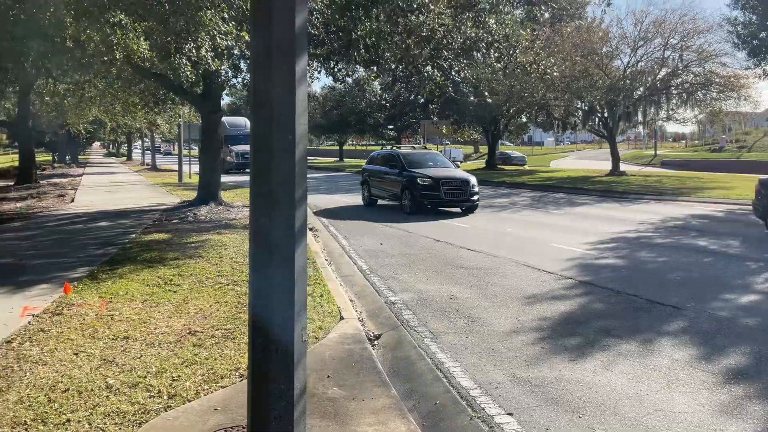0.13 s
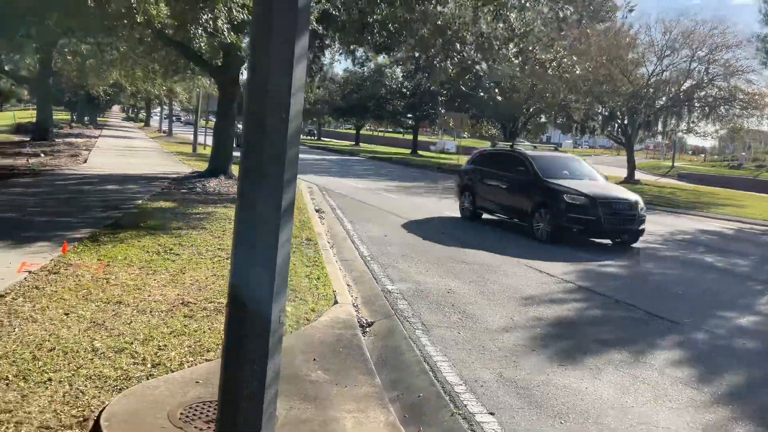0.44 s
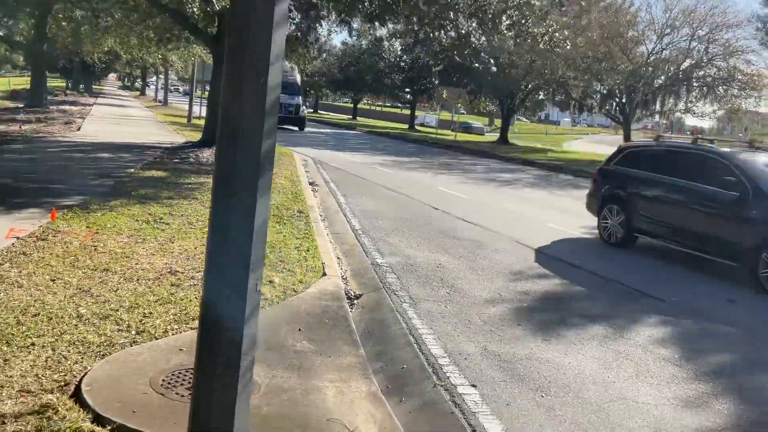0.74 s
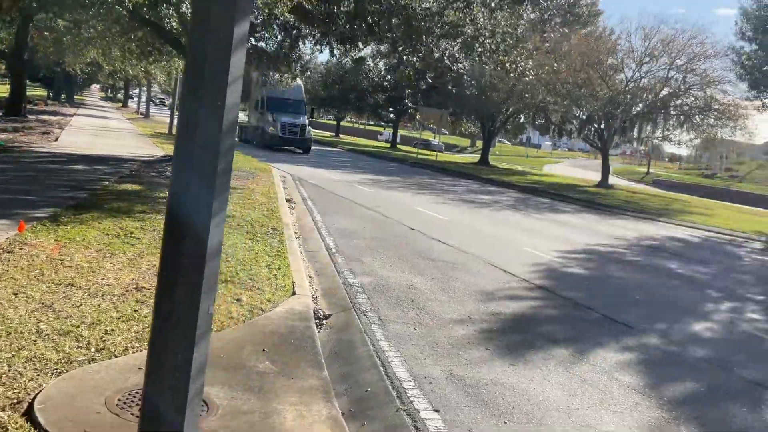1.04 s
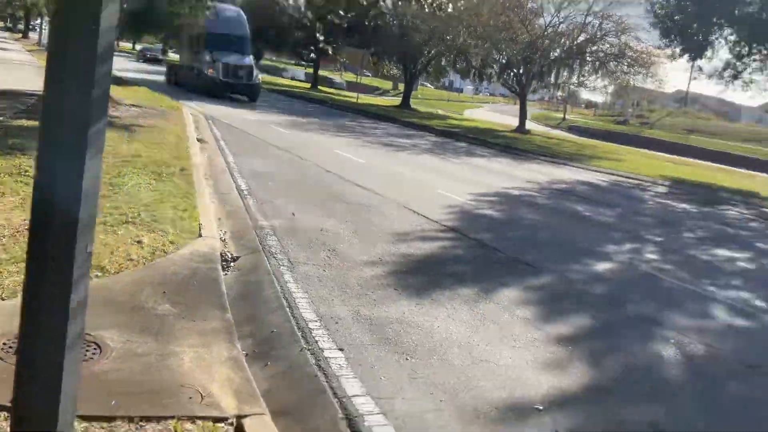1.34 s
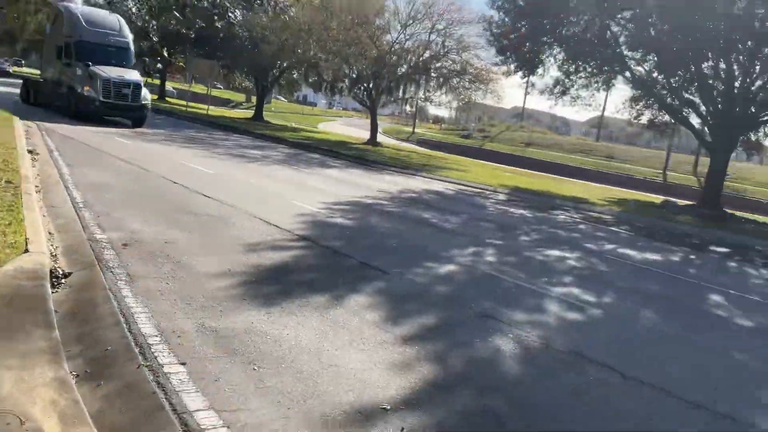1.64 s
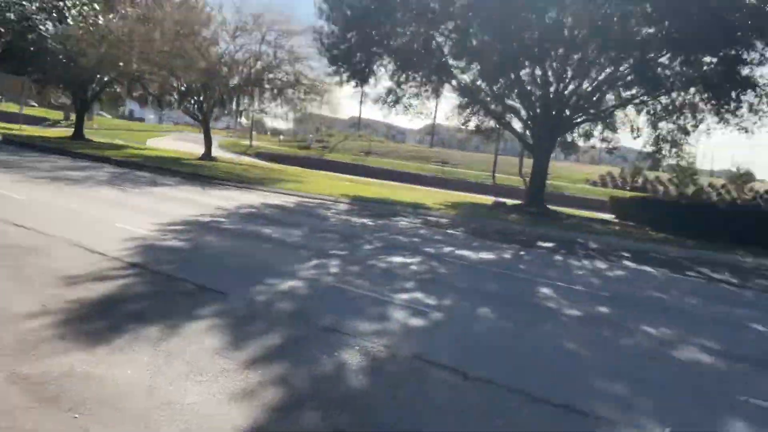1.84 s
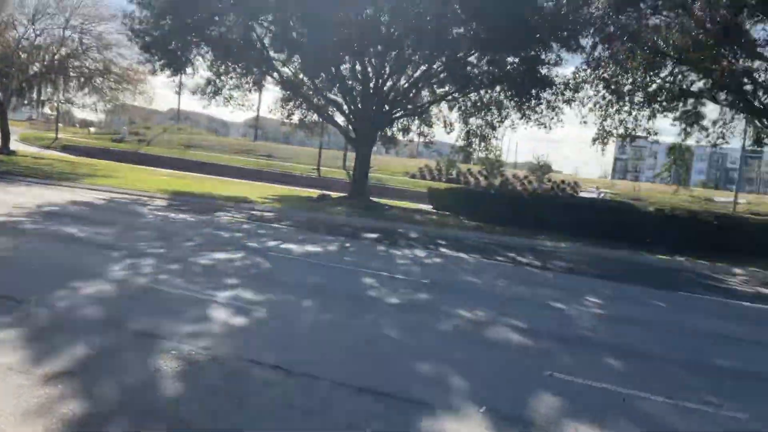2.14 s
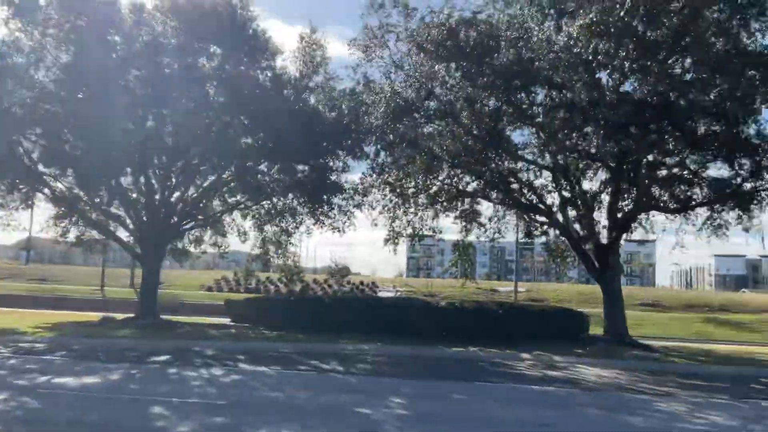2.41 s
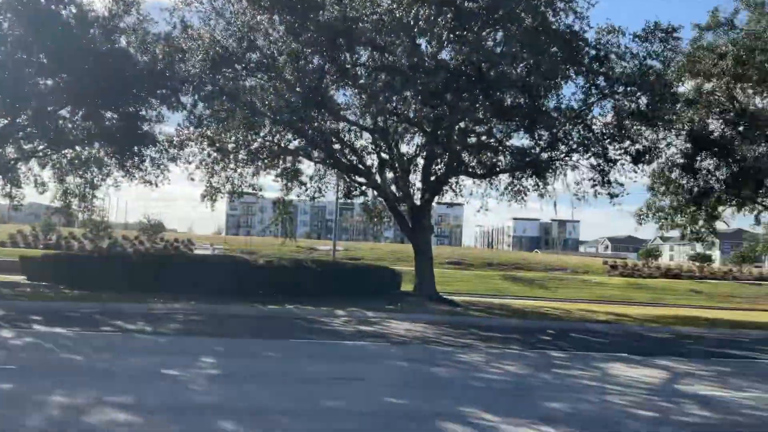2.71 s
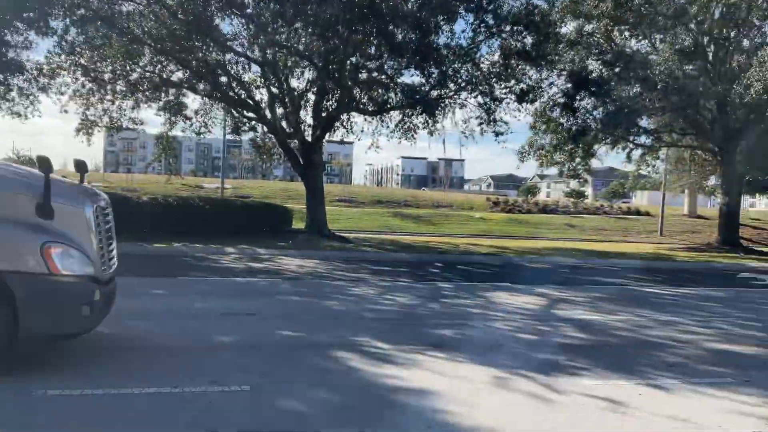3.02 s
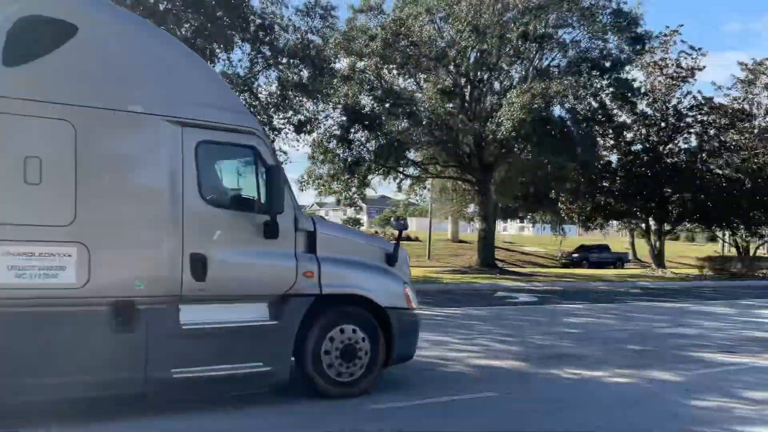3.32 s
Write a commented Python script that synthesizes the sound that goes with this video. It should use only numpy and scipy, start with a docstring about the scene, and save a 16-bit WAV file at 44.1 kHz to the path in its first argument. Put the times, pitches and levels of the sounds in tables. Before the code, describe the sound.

A diesel truck rumbles up and passes close, following the tyre roar of two cars.

```python
"""A heavy diesel truck draws near and passes close by the kerb, after two cars roll past on concrete.
The truck's engine fires in a steady hum that drops in pitch as it goes by. Its tyres roar, hiss and
sing, grit snaps under them, loose metal clinks, and the air it pushes thumps on the microphone.
A handheld recorder hears it all through two closely spaced openings (ports), left and right."""
import sys
import numpy as np
from scipy import signal
from scipy.fft import rfft, irfft
from scipy.io import wavfile
from scipy.ndimage import uniform_filter1d

SR = 44100
rng = np.random.default_rng(int(sys.argv[2]) if len(sys.argv) > 2 else 0)


def generate_wav(sig):
    """Save sig (samples, or channels by samples) to the path in sys.argv[1] as 16-bit PCM at SR."""
    pcm = np.round(np.clip(np.atleast_2d(sig).T, -1, 1) * 32767).astype(np.int16)
    wavfile.write(sys.argv[1], SR, pcm)


N = 153027
T = np.arange(N) / SR  # the time of each sample, in seconds

# The deep hum of traffic. Each row: time in seconds, pitch in Hz, level in dB.
TRAFFIC_HUM = [(0, 58, -41), (1.2, 57.5, -35.5), (2.0, 55, -38.5), (3.47, 53, -38)]
# The tyre roar of the cars. Each row: time in seconds, level in dB.
CAR_LEVELS = [(0, -24), (.3, -22.5), (.6, -22.5), (.95, -22), (1.2, -24), (1.45, -27.5), (1.75, -34.5),
              (2.1, -41), (3.47, -53)]
# Brief hums of tyres. Each row: peak time and width in seconds, pitch and width in Hz, level in dB.
TYRE_HUMS = [(.3, 0.2, 1770, 452, -31.5), (.86, 0.17, 700, 190, -27), (1.15, 0.12, 742, 150, -26.5),
             (1.661, 0.23, 1330, 338, -30.5), (3.42, 0.14, 610, 140, -27.5), (.55, 0.26, 3900, 1100, -49.5)]
# The colour of each noise, from bass to treble. Each row: frequency in Hz, relative strength in dB.
CAR_TYRE_COLOUR = [(60, -26), (180, -12), (330, -5), (490, -7.5), (620, -1.5), (820, -3.5), (955, -5.5),
                   (1120, -2), (1370, -8), (1560, -6), (1880, -10.5), (2150, -12), (2750, -20), (3600, -24),
                   (4300, -29), (6000, -35.5), (9000, -38.5), (12000, -46.5), (15500, -62)]
TRUCK_TYRE_COLOUR = [(120, -36), (300, -5), (410, -4), (530, -7.5), (630, -8), (730, -7), (850, -6),
                     (1080, -4.5), (1250, -6), (1600, -9), (2200, -18), (3000, -23), (4200, -29),
                     (6000, -29), (9000, -52), (15500, -68)]
RUMBLE_COLOUR = [(20, -38), (36, -36), (50, -4), (65, 1), (100, -1), (160, -1), (240, -3.5), (380, -9),
                 (550, -23), (1200, -64)]
HISS_COLOUR = [(2000, -20), (3400, -4), (4500, -4.0), (5200, -5.5), (6000, 4.0), (7200, -1), (9000, -2),
               (11000, -11.0), (13000, -19.5), (15500, -50)]
WHINE_COLOUR = [(560, -62), (680, -3.5), (790, 0), (900, -2.5), (1050, -13), (1400, -57)]
SIZZLE_COLOUR = [(2000, -25), (4000, 0), (8000, -6), (11000, -6), (15500, -12)]
SNAP_COLOUR = [(1800, -25), (3800, 5), (8000, -3), (11000, -9), (15500, -17)]
GUST_COLOUR = [(25, -35), (45, 8), (90, -12), (150, 1), (220, -9), (400, -3), (700, -48)]
# How the two ports differ. Each row: frequency in Hz, left level minus right in dB,
# likeness from 0 to 1, how far the left wave is ahead in radians.
CAR_PORTS = [(100, -19, 1, -0.0), (340, -1.5, 0.93, -0.5), (503, -7, 0.23, 0.5), (566, -3.5, 0.92, 1.82),
             (776, 1.5, 0.7, 1.5), (926, -8, 0.3, 1.96), (1150, 5.5, 0.5, 0.7), (1660, 0.5, 0.53, -1.55),
             (2000, 0.5, 0.46, -2), (2560, 0, 1, -2.5), (3390, -1, 0.99, -5), (4200, 0, 0.97, -6),
             (6000, 0, 1, -6.5), (7900, -5, 0.3, -4)]
TRUCK_PORTS = [(100, -2.5, 0.97, 0.0), (270, -3.5, 0.95, 0.7), (476, -2, 0.55, 0.52), (616, 0.5, 0.72, 2),
               (880, 12.5, 0.86, 3), (980, 2, 0.075, 1.5), (1270, 6, 0.47, 2.44), (1700, 1, 0.5, 1),
               (2260, -2.5, 0.12, -1), (2980, -3.5, 0.79, -3), (3600, -3.5, 0.53, -5),
               (4360, -2.5, 0.91, -6.5), (5800, -5.5, 0.95, -6.5), (8050, -2, 0.96, -5.5)]
# Gusts ahead of the truck. Each row: peak time and width in seconds, level in dB.
GUSTS = [(2.64, 0.038, -26), (2.87, .05, -28)]
# Thumps of air. Each row: peak time and width in seconds, pitch in Hz, level in dB.
THUMPS = [(2.623, .009, 120, -10), (2.642, .004, 300, -15), (2.668, .009, 105, -17),
          (2.708, .005, 125, -14), (2.772, .007, 110, -15), (2.798, .005, 150, -15), (2.853, .010, 135, -7),
          (2.918, .0045, 115, -4), (3.113, .005, 130, -16), (3.277, .006, 145, -14)]
# Spurts of hiss. Each row: peak time and width in seconds, pitch and width in Hz, level in dB.
SPURTS = [(1.69, 0.026, 10500, 8000, -52), (2.387, .009, 6850, 1000, -41), (2.44, .014, 6650, 1500, -40),
          (2.58, .05, 8100, 700, -48), (2.81, .007, 11000, 2500, -46)]
# A rising rush, a falling whistle and the tread's note. Each row: time in seconds, pitch in Hz, level in dB.
RUSH = [(0, 6200, -78), (2.0, 6000, -64), (2.38, 6580, -47), (2.75, 8450, -46), (2.95, 9020, -51),
        (3.32, 10700, -61)]
WHISTLE = [(2.9, 14000, -85), (3.01, 13600, -59), (3.12, 12300, -62), (3.18, 10900, -55),
           (3.23, 10330, -46), (3.26, 9600, -61), (3.35, 8400, -85)]
TREAD_NOTE = [(1.2, 843, -50), (1.7, 840, -31.5), (2.65, 825, -31), (3.0, 790, -20), (3.25, 754.4, -24.5),
              (3.47, 692, -27)]
# Snaps of grit and clinks of loose metal. Each row: start in seconds, level in dB.
GRIT_SNAPS = [(.578, -39), (2.958, -44), (3.073, -42), (3.152, -39)]
CLINKS = [(2.714, -37), (2.882, -35), (2.914, -36), (2.955, -30), (3.005, -33), (3.07, -31), (3.15, -34),
          (3.218, -36)]
# The notes the metal rings with. Each row: pitch in Hz, relative strength in dB.
METAL_NOTES = [(4050, -2), (5900, 3), (7700, 0), (8850, -1), (11750, -12), (13750, -11)]
# The rolling truck. Each row: time in seconds, then levels in dB of rumble, tyre roar, hiss,
# tread whine and grit sizzle.
TRUCK_LEVELS = [(0, -30.5, -33.5, -65, -31.5, -71), (.7, -29.5, -40.5, -50, -28, -58),
                (1.4, -29, -29.5, -51.5, -28, -71), (1.9, -26, -27.5, -46.5, -28.5, -65),
                (2.25, -27, -26, -44, -25, -64), (2.45, -24, -25, -43.5, -26, -52),
                (2.65, -21, -24.5, -44.5, -23.5, -54), (2.95, -23, -23, -40, -23.5, -45),
                (3.2, -25.5, -22.5, -42, -21.5, -45.5), (3.33, -22.5, -24, -45.5, -24, -51),
                (3.47, -17, -22.5, -51, -25.5, -48)]
# The drone as the cab passes. Each row: pitch at the swell's peak in Hz, width in Hz, level in dB.
DRONE_NOTES = [(193, 13, -26.5), (258, 8.9, -24.5), (315, 13.7, -37), (291, 120, -30)]
# The diesel engine. Each row: time in seconds, firings per second as heard, level in dB.
ENGINE = [(0, 125.1, -34), (.9, 125.7, -31), (1.5, 125.7, -31), (2.0, 127.7, -28.5), (2.35, 127.7, -23),
          (2.7, 126.1, -25.5), (2.9, 124.8, -25.5), (3.1, 122.1, -19.5), (3.25, 116.9, -24),
          (3.47, 112.5, -27)]
# Its tones. Each row: multiple of the firing rate, level in dB added to the engine's.
ENGINE_TONES = [(.838, -7), (1, -1), (1.5, -13.5), (2, -12), (3, -16)]


def amp(db):
    """Turns decibels into a number to multiply a sound by."""
    return 10 ** (np.asarray(db) / 20)


def unit(x):
    """Scales a signal so that its average strength (rms) is 1."""
    return x / np.sqrt(np.mean(x ** 2) + 1e-20)


def curve(table, column=1):
    """Joins a column's values with straight lines, giving one value per sample."""
    rows = np.array(table)
    return np.interp(T, rows[:, 0], rows[:, column])


def at_hz(table, hz, column=1):
    """Looks up a column by frequency, giving every octave equal room."""
    rows = np.array(table)
    return np.interp(np.log(hz + 1), np.log(rows[:, 0]), rows[:, column])


def swell(peak_s, width_s):
    """A bell-shaped rise and fall around a moment."""
    return np.exp(-.5 * ((T - peak_s) / width_s) ** 2)


def hits(table, decay_s):
    """A loudness that jumps up at each start time and dies away."""
    return sum(amp(db) * (T >= s) * np.exp(-abs(T - s) / decay_s) for s, db in table)


def drift(rate_hz):
    """A smooth random wobble of strength 1; a higher rate wobbles faster."""
    hz = np.fft.rfftfreq(N, 1 / SR)
    return unit(irfft(rfft(rng.standard_normal(N)) * np.exp(-.5 * (hz / rate_hz) ** 2), N))


def band(hz, width_hz):
    """Noise around a pitch: narrow sounds like a note, wide like a hiss."""
    phase = 2 * np.pi * np.cumsum(hz * np.ones(N)) / SR
    return unit(drift(width_hz / 2) * np.cos(phase) + drift(width_hz / 2) * np.sin(phase))


def roar(colour, ports, patch_db, size=1024):
    """Noise of a given colour with louder and softer patches, as the two ports hear it."""
    hz = np.fft.rfftfreq(size, 1 / SR)
    a, b, c, d, patches = rng.standard_normal((5, 4 * N // size + 6, len(hz)))
    patches = uniform_filter1d(patches, size=8, axis=0)  # smooth over time
    patches = unit(uniform_filter1d(patches, size=9, axis=1))  # and over frequency
    balance = amp(at_hz(ports, hz))
    likeness = np.clip(at_hz(ports, hz, column=2), 0, 1)
    lag = np.exp(-1j * at_hz(ports, hz, column=3))
    left = a + 1j * b
    right = (likeness * left + np.sqrt(1 - likeness ** 2) * (c + 1j * d)) * lag
    spectra = np.array([left * balance, right]) / np.sqrt(1 + balance ** 2)
    spectra *= amp(at_hz(colour, hz) + patch_db * patches)
    _, noise = signal.istft(spectra.transpose(0, 2, 1), nperseg=size, noverlap=size * 3 // 4)
    return unit(noise[:, :N])


def traffic_hum():
    """A low, wavering hum lies under the traffic."""
    loudness = np.sqrt(2) * amp(curve(TRAFFIC_HUM, column=2) + 1.7 * drift(7.6))
    pitch_hz = curve(TRAFFIC_HUM) + 1.8 * drift(5.6)
    return loudness * np.sin(2 * np.pi * np.cumsum(pitch_hz) / SR)


def cars():
    """The cars' tyres roar on the concrete and fade as they leave."""
    return amp(curve(CAR_LEVELS)) * roar(CAR_TYRE_COLOUR, CAR_PORTS, patch_db=.8)


def tyre_hums():
    """Each set of tyres sings around its own pitch for a moment as it goes by."""
    hums = 0
    for s, width_s, hz, width_hz, db in TYRE_HUMS:
        colour = [(hz / 3, -70), (hz - .96 * width_hz, -22), (hz - width_hz / 2, -2),
                  (hz + width_hz / 2, -2), (hz + .99 * width_hz, -22), (hz * 3, -70)]
        hums += amp(db) * swell(s, width_s) * roar(colour, CAR_PORTS, patch_db=2)
    return hums


def gusts(rough_db=5.5):
    """Two lumpy gusts of wind hit the microphone just ahead of the truck."""
    loudness = sum(amp(db) * swell(s, width_s) for s, width_s, db in GUSTS)
    return loudness * amp(rough_db * drift(22)) * roar(GUST_COLOUR, TRUCK_PORTS, patch_db=0, size=4096)


def air_thumps():
    """Short, low pushes of air from the truck thump on the microphone."""
    return sum(amp(db) * swell(s, width_s) * np.cos(2 * np.pi * hz * (T - s))
               for s, width_s, hz, db in THUMPS)


def spurts():
    """High hisses come and go in a moment."""
    return sum(amp(db) * swell(s, width_s) * band(hz, width_hz)
               for s, width_s, hz, width_hz, db in SPURTS)


def rush(flicker_db=2.3):
    """An uneven hiss climbs in pitch as the truck nears."""
    return amp(curve(RUSH, column=2) + flicker_db * drift(22)) * band(curve(RUSH), width_hz=2900)


def whistle(flicker_db=2.5):
    """A faint, sputtering whistle slides down as the cab goes by."""
    return amp(curve(WHISTLE, column=2) + flicker_db * drift(25)) * band(curve(WHISTLE), width_hz=600)


def rattle():
    """Loose metal on the truck clinks, always ringing with the same few notes."""
    ringing = unit(sum(amp(db) * band(hz, width_hz=260) for hz, db in METAL_NOTES))
    return hits(CLINKS, decay_s=.011) * ringing


def grit(grains_per_s=2200, spread_db=3, grain_s=.00088):
    """Grit under the tyres makes a sizzle of tiny grains and a few clear snaps."""
    grains = rng.random(N) < grains_per_s / SR
    strengths = amp(spread_db * np.minimum(rng.exponential(1, N), 3))
    # Give each grain a short fading tail.
    crackle = unit(signal.lfilter([1], [1, -np.exp(-1 / (grain_s * SR))], grains * strengths))
    sizzle = crackle * roar(SIZZLE_COLOUR, TRUCK_PORTS, patch_db=2.5, size=512)
    snaps = hits(GRIT_SNAPS, decay_s=.004) * roar(SNAP_COLOUR, TRUCK_PORTS, patch_db=2.5, size=512)
    return amp(curve(TRUCK_LEVELS, column=5)) * sizzle + snaps


def tread_note():
    """The tread of the front tyres sings a note that sinks as they pass."""
    sides = np.array([[1], [-.39]])  # the right side is weaker, its wave upside down
    return amp(curve(TREAD_NOTE, column=2)) * band(curve(TREAD_NOTE), width_hz=33) * sides


def drone(peak_s=3.35, fall_per_s=.15, firings_per_turn=3):
    """A drone swells and falls in pitch as the cab passes, throbbing with each turn of the engine."""
    doppler = np.exp(-fall_per_s * (T - peak_s))
    hum = sum(amp(db) * band(hz * doppler, width_hz) for hz, width_hz, db in DRONE_NOTES)
    turns = np.cumsum(curve(ENGINE)) / firings_per_turn / SR
    throb = unit(1 + .4 * np.cos(2 * np.pi * turns))
    return hum * throb * swell(peak_s, width_s=.18) * amp([[-2.3], [1.7]])  # louder on the right


def engine(waver_hz=.9, waver_db=1.5):
    """The diesel's wavering tones follow its firing rate, heard to sink as the truck goes by."""
    firings = np.cumsum(curve(ENGINE) + waver_hz * drift(8.2)) / SR
    tones = sum(amp(db + waver_db * drift(4.1)) * np.sin(2 * np.pi * (multiple * firings + rng.random()))
                for multiple, db in ENGINE_TONES)
    return np.sqrt(2) * tones * amp(curve(ENGINE, column=2)) * amp([[-.7], [.7]])


def truck_rolling(flutter_db=.62):
    """A low rumble, fluttering tyre roar and hiss, and a hollow tread whine grow as the truck nears."""
    rumble = amp(curve(TRUCK_LEVELS, 1)) * roar(RUMBLE_COLOUR, TRUCK_PORTS, patch_db=0, size=4096)
    tyres = amp(curve(TRUCK_LEVELS, 2)) * roar(TRUCK_TYRE_COLOUR, TRUCK_PORTS, patch_db=.8)
    hiss = amp(curve(TRUCK_LEVELS, 3)) * roar(HISS_COLOUR, TRUCK_PORTS, patch_db=1.2)
    whine = amp(curve(TRUCK_LEVELS, 4)) * roar(WHINE_COLOUR, TRUCK_PORTS, patch_db=1, size=2048)
    return rumble + whine + (tyres + hiss) * amp(flutter_db * drift(27))


def scene():
    """Everything heard from the kerb, added together."""
    truck = truck_rolling() + rush() + engine() + drone() + spurts()
    truck = truck + grit() + rattle() + whistle() + tread_note()
    return cars() + tyre_hums() + traffic_hum() + truck + gusts() + air_thumps()


def record(dry, mono_above_hz=7200, start_s=.036, top_hz=15700):
    """The recorder makes the treble alike on both sides, starts a moment late and cuts the very top."""
    hz = np.fft.rfftfreq(N, 1 / SR)
    middle, side = (dry[0] + dry[1]) / 2, (dry[0] - dry[1]) / 2
    side = irfft(rfft(side) / (1 + (hz / mono_above_hz) ** 20), N)
    stereo = np.array([middle + side, middle - side]) * (T >= start_s)
    low_pass = signal.firwin(1023, top_hz, window=("kaiser", 9), fs=SR)
    return signal.oaconvolve(stereo, low_pass[None], "same")


dry = scene()
out = record(dry)
generate_wav(out)
```